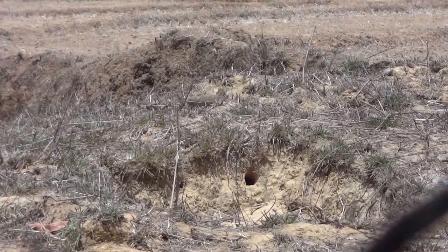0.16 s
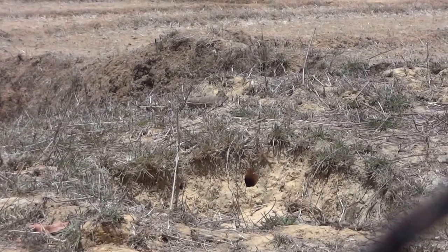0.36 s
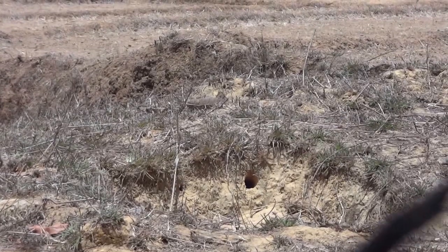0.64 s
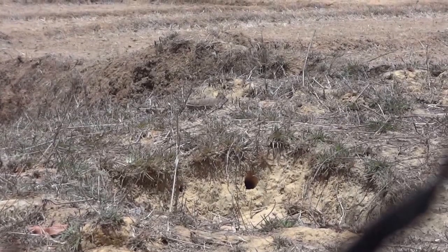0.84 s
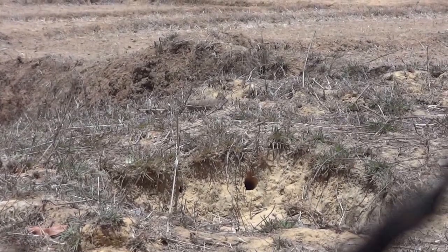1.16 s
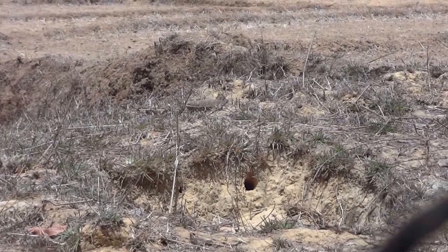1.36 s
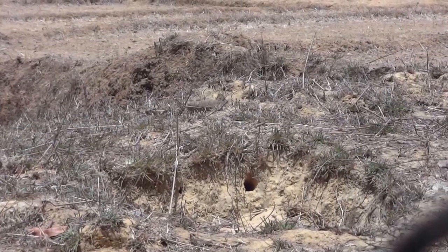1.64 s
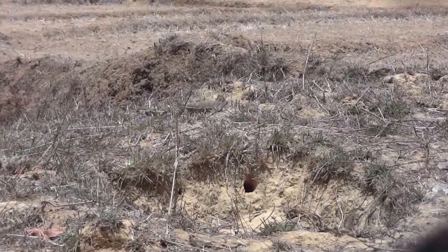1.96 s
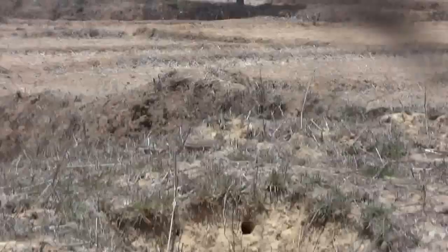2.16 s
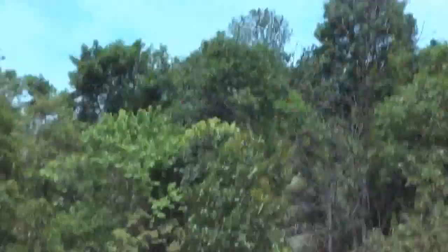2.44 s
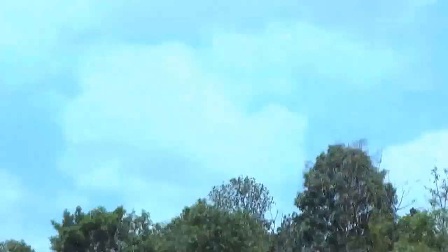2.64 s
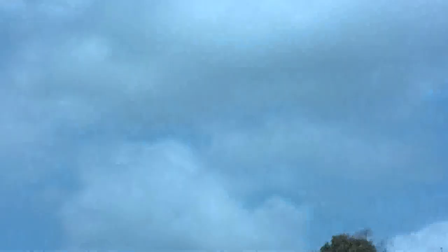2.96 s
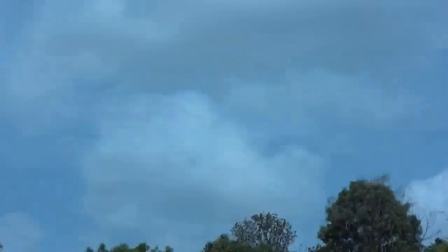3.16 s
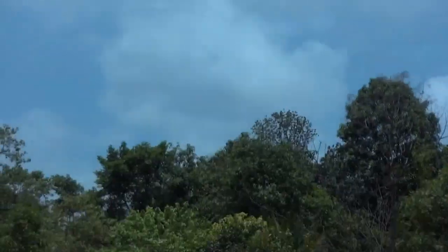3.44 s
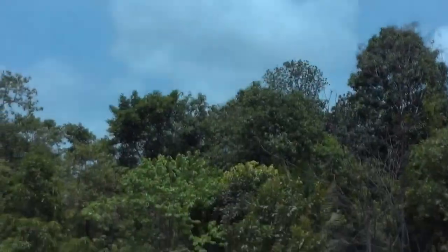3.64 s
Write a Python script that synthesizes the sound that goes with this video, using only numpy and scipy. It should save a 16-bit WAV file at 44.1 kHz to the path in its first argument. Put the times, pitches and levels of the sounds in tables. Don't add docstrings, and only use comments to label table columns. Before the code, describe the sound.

Thin, high, slightly drooping bird whistles repeat at a steady pace above a faint grassy breeze.

```python
import sys
import numpy as np
from scipy import signal
from scipy.fft import rfft, irfft, next_fast_len
from scipy.io import wavfile
from scipy.ndimage import uniform_filter1d, map_coordinates

SR = 44100
rng = np.random.default_rng(int(sys.argv[2]) if len(sys.argv) > 2 else 0)


def decibels_to_gain(level_db):
    exponent = np.asarray(level_db, float) / 20
    return 10 ** exponent


def inscribe(sig):
    pcm = np.round(np.clip(np.atleast_2d(sig).T, -1, 1) * 32767)
    wavfile.write(sys.argv[1], SR, pcm.astype(np.int16))


N = 167580

# (time [s], level [dB])
BREEZE_STRENGTH = [(0, -48.5), (.5, -49.5), (1.05, -50.5), (1.29, -53), (1.6, -52), (2.1, -54), (2.54, -54),
                   (2.75, -52.5), (2.92, -54), (3.15, -53), (3.8, -55.5)]
# (frequency [Hz], density [dB per Hz])
GRASS_MID_SPECTRUM = [(1180, -16), (2000, -6.5), (2970, -0.5), (3560, -2), (3910, -2), (4640, -4),
                      (6900, -8), (9980, -10), (15600, -23.5)]
GRASS_SIDE_SPECTRUM = [(1180, -44), (2000, -11), (3470, 1), (3910, -2), (8550, -10), (13600, -20.5),
                       (15600, -34)]
FAR_MID_SPECTRUM = [(15, -43), (25, -13), (154, -19.5), (189, -17.5), (326, -7.5), (408, -4.5), (756, -0.5),
                    (1540, -2), (2200, -5.5), (2860, -17), (4840, -120)]
FAR_SIDE_SPECTRUM = [(15, -68), (25, -51), (393, -7), (501, -2.5), (615, -6), (676, -1), (800, -3),
                     (1400, -4.5), (2200, -6.5), (2860, -15), (4840, -120)]
# (start [s], length [s], level [dB], settled pitch [Hz], middle of slide [s])
WHISTLES = [(.024, .192, -45, 2728, .048), (.543, .174, -43.5, 2722, .038), (1.056, .17, -44.8, 2718, .026),
            (1.593, .16, -43.5, 2680, .05), (2.158, .14, -42.5, 2688, .033),
            (2.712, .137, -46.5, 2694, .04), (3.354, .153, -46.5, 2700, .026)]
# (start [s], length [s], level [dB], first pitch [Hz], last pitch [Hz])
ANSWERS = [(.27, .03, -49, 3175, 3150), (.335, .035, -59, 3180, 3160), (.743, .064, -43, 3095, 3005),
           (.815, .022, -47, 3060, 3045), (.838, .022, -51, 3040, 3020), (.808, .046, -56, 4240, 4215),
           (.856, .04, -49, 2155, 2125), (.895, .045, -57, 2120, 2095), (.96, .05, -59, 2095, 2120),
           (3.186, .022, -57, 3850, 3950), (3.2, .02, -56, 4420, 4250), (3.214, .028, -58, 4150, 3880)]
# (start [s], length [s], level [dB], pitch [Hz])
RETURNS = [(.218, .025, -57, 2700), (1.222, .05, -56, 2695), (1.75, .02, -55, 2670), (2.3, .03, -55, 2720),
           (2.85, .06, -58, 2670), (3.51, .03, -56, 2660)]
# (time [s], gain [dB], half width [s])
AIR_FADES = [(.048, 2.5, .015), (.098, -8, .022), (.128, -9, .009), (.148, 2, .012), (.192, -5, .012),
             (.566, 1, .012), (.585, -2.5, .008), (.755, -3, .012), (.865, -5, .014), (1.065, -2.5, .012),
             (1.17, -2.5, .008), (1.6, -4, .012), (1.627, -16, .012), (2.168, -5, .01), (2.21, -5, .007),
             (2.265, 1, .02), (2.734, 2, .01), (2.756, -9, .011), (2.79, 2.5, .02), (2.835, -1.5, .015),
             (3.386, -6, .009), (3.436, -3, .009), (3.49, -2, .02)]
# (time [s], level [dB])
GUST_LEVEL = [(0, -61), (.1, -57), (.135, -47), (.16, -38), (.2, -38.5), (.25, -41), (.275, -49),
              (.36, -58), (.45, -64), (.6, -64), (.7, -69), (.85, -66), (.95, -58), (1.03, -70), (1.2, -74),
              (1.4, -76.5)]
# (frequency [Hz], density [dB per Hz])
BUFFET_SPECTRUM = [(15, -45), (25, 6.5), (54, -3.5), (177, -1.5), (270, -7.5), (355, -5.5), (435, -12),
                   (800, -24), (1040, -57), (1760, -120)]
# (time [s], level [dB], frequency [Hz])
PUFFS = [(.083, -44, 85), (.104, -52, 170), (.124, -36, 272), (.143, -28, 170), (.157, -24, 120),
         (.174, -29, 310), (.186, -35, 140), (.197, -26, 220), (.215, -35, 300), (.226, -31, 200),
         (.236, -36, 220), (.251, -27, 180), (.266, -39, 164), (.295, -45, 110), (.312, -49, 65),
         (.348, -46, 78), (.413, -38, 120), (.489, -55, 108), (.6, -48.5, 123), (.898, -49, 112),
         (.954, -51, 108), (.989, -47.5, 96), (1.199, -58, 60), (1.223, -60, 86), (2.039, -60, 81)]
# (middle [s], half length [s], level [dB], centre [Hz], bandwidth [octaves])
RUSTLES = [(.11, 0.036, -51, 3800, .5), (0.22, 0.033, -52, 3200, 0.26), (.31, 0.018, -52, 2900, 0.3),
           (.555, 0.048, -52.5, 7100, .5), (.83, 0.03, -52, 4000, 0.34), (.96, 0.03, -56, 2400, 0.4),
           (2.81, 0.032, -55, 8100, 0.56), (3.14, 0.12, -56.5, 7500, 0.67), (3.21, 0.038, -61, 3900, .1),
           (2.7, 0.046, -54, 4400, 0.92), (0.8, 0.096, -60, 10500, .3), (0.11, 0.057, -51, 8300, 0.7),
           (0.68, 0.13, -57, 8900, 0.34)]
# (time [s], peak level [dB], centre [Hz], bandwidth [octaves])
TICKS = [(.3114, -34, 2920, .35), (.5396, -37, 7000, .58), (.9044, -38, 3100, .2), (1.6455, -43, 11000, .9),
         (1.779, -45, 6500, .5), (1.961, -45, 2500, .8), (1.975, -50, 12500, .4), (2.3094, -47, 11500, .5),
         (3.1295, -44, 10000, .6), (3.1394, -43, 7000, .3), (3.755, -43, 4300, .3)]
# (frequency [Hz], phase [rad])
PORT_LEAD = [(400, 0), (690, 1), (1400, .8), (1900, .45), (2800, .47), (3800, .34), (6900, .26),
             (14000, .1)]


def unit(x):
    return x / np.sqrt(np.mean(x ** 2) + 1e-20)


def along(points, hz):
    f, v = np.transpose(points)
    return np.interp(np.log(hz + 1), np.log(f + 1), v)


def curve(rows):
    return np.interp(np.arange(N) / SR, *np.transpose(rows))


def wobble(rate_hz):
    knots = rng.standard_normal(int(N * rate_hz / SR) + 4)
    return map_coordinates(knots, [np.arange(N) * rate_hz / SR])


def band(x, hz, octaves):
    f = np.fft.rfftfreq(len(x), 1 / SR) + 1
    bell = np.exp(-(np.log2(f / hz) / octaves) ** 2)
    return unit(irfft(rfft(x) * bell, len(x)))


def hiss(spectrum, patchy_db):
    z = signal.stft(rng.standard_normal(N + 512), nperseg=512)[2]
    field = uniform_filter1d(rng.standard_normal(z.shape), 5, 0)
    field = uniform_filter1d(field, 9, 1)
    x = signal.istft(z * decibels_to_gain(patchy_db * unit(field)), nperseg=512)[1][:N]
    m = next_fast_len(N + 8192)
    gain = decibels_to_gain(along(spectrum, np.fft.rfftfreq(m, 1 / SR)))
    return unit(irfft(rfft(x, m) * gain, m)[:N])


def pair(mid, side):
    return np.array([mid + side, mid - side])


def add(out, s, x):
    part = out[..., max(round(s * SR), 0):][..., :x.shape[-1]]
    part += x[..., :part.shape[-1]]


def grass():
    stalks_per_s, stalk_db, crackle_t60_s = 150, -14.5, 0.011
    rows = rng.random((int(stalks_per_s * N / SR), 2))
    hits = (rows[:, 0] * N).astype(int)
    stalks = np.bincount(hits, decibels_to_gain(stalk_db + 13 * rows[:, 1] ** 3), N)
    decay = decibels_to_gain(-60 * np.arange(300) / SR / crackle_t60_s)
    crackle = 1 + np.convolve(stalks, decay)[:N]
    mid = hiss(GRASS_MID_SPECTRUM, patchy_db=1.1) * crackle
    lean = 0.07 * band(mid, 2800, 1.2)
    side = lean + decibels_to_gain(-12) * hiss(GRASS_SIDE_SPECTRUM, patchy_db=1.1)
    level_db = curve(BREEZE_STRENGTH) + 3.0 + 0.54 * wobble(7.06) + 0.15 * wobble(20)
    return pair(mid, side) * decibels_to_gain(level_db)


def far_wash():
    far_db, follows = -4, 0.24
    strength_db = curve(BREEZE_STRENGTH)
    mean_db = strength_db.mean()
    mid = hiss(FAR_MID_SPECTRUM, patchy_db=1.2)
    side = 0.055 * mid + decibels_to_gain(-2.5) * hiss(FAR_SIDE_SPECTRUM, patchy_db=-0.5)
    return pair(mid, side) * decibels_to_gain(mean_db + far_db + follows * (strength_db - mean_db))


def note(t, length_s, hz, level_db, waver):
    attack_s, release_s = min(.011, length_s / 3), min(.015, length_s / 3)
    waver_hz, overtone_db = 9, -27
    edge = np.clip(np.minimum(t / attack_s, (length_s - t) / release_s), 0, 1)
    phase = 2 * np.pi * np.cumsum(hz + waver_hz * waver[:len(t)]) / SR
    tone = np.sin(phase) + decibels_to_gain(overtone_db) * np.sin(2 * phase)
    return np.sqrt(2) * np.sin(np.pi / 2 * edge) * decibels_to_gain(level_db) * tone


def whistles(waver):
    glide_ratio, glide_s = .059, .012
    sag_hz_per_s, droop_hz, droop_s = 300, 70, .011
    out = np.zeros(N)
    for s, length_s, db, end_hz, slide_s in WHISTLES:
        t = np.arange(int(length_s * SR)) / SR
        slide = 1 + glide_ratio / (1 + np.exp((t - slide_s) / glide_s))
        sag = sag_hz_per_s * (length_s - t)
        droop = droop_hz * np.exp((t - length_s) / droop_s)
        add(out, s, note(t, length_s, end_hz * slide + sag - droop, db, waver[round(s * SR):]))
    return out


def answers_and_returns(waver):
    out = np.zeros(N)
    steady = [(*row, row[-1]) for row in RETURNS]
    for s, length_s, db, first_hz, last_hz in ANSWERS + steady:
        t = np.arange(int(length_s * SR)) / SR
        hz = first_hz + (last_hz - first_hz) * t / length_s
        add(out, s, note(t, length_s, hz, db, waver[round(s * SR):]))
    return out


def air_fading():
    t = np.arange(N) / SR
    dips_db = sum(db * np.exp(-((t - s) / half_s) ** 2) for s, db, half_s in AIR_FADES)
    return decibels_to_gain(1.1 * wobble(37) + dips_db)


def tree_echo(x):
    t60_s, delay_s = 0.52, .008
    t = np.arange(SR // 2) / SR
    tail = rng.standard_normal((2, len(t))) * decibels_to_gain(-60 * t / t60_s) * (t > delay_s)
    tail = tail / np.linalg.norm(tail[0])
    return signal.fftconvolve(x[None], tail, axes=1)[:, :N]


def birds():
    echo_db, pan_db = -16, 1.6
    waver = wobble(60)
    calls = (whistles(waver) + answers_and_returns(waver)) * air_fading()
    return calls * decibels_to_gain([[pan_db / 2], [-pan_db / 2]]) + decibels_to_gain(echo_db) * tree_echo(calls)


def rumble():
    level_db = curve(GUST_LEVEL) - 5.5 + 3.3 * wobble(40)
    mid = hiss(BUFFET_SPECTRUM, patchy_db=1.0)
    side = 0.86 * band(hiss(BUFFET_SPECTRUM, patchy_db=2.5), 280, 1.7)
    return decibels_to_gain(level_db) * pair(mid, side)


def push(t, hz, turn):
    cycles = 1.08
    return np.exp(-(t * hz * 2 / cycles) ** 2) * np.cos(2 * np.pi * (hz * t + turn))


def puffs():
    side_hz_ratio, lean = 1.56, .35
    out = np.zeros((2, N))
    t = np.arange(-1500, 1500) / SR
    for (s, db, hz), turns in zip(PUFFS, rng.random((len(PUFFS), 2))):
        mid = push(t, hz, turns[0])
        side_db = -1.5 + .3 * (db + 32)
        side = decibels_to_gain(side_db) * push(t, hz * side_hz_ratio, turns[1])
        add(out, s + t[0], decibels_to_gain(db - 3.5) * pair(mid, side + lean * mid))
    return out


def rustles():
    out = np.zeros(N)
    t = np.arange(-8192, 8192) / SR
    grains = rng.standard_normal((len(RUSTLES), len(t)))
    for (s, half_s, db, hz, octaves), noise in zip(RUSTLES, grains):
        swell = decibels_to_gain(db) * np.exp(-(t / half_s) ** 2) * band(noise, hz, octaves)
        before_start = max(-round((s + t[0]) * SR), 0)
        add(out, s + t[0], swell[before_start:])
    return out


def ticks():
    t60_s = 0.009
    out, t = np.zeros(N), np.arange(512) / SR
    for (s, db, hz, octaves), noise in zip(TICKS, rng.standard_normal((len(TICKS), 512))):
        burst = np.roll(decibels_to_gain(-60 * t / t60_s) * noise, 40)
        add(out, s, decibels_to_gain(db - 14) * band(burst, hz, octaves))
    return out


def stem_knock():
    start_s, t60_s = 3.1285, .07
    out, t = np.zeros(N), np.arange(4096) / SR
    for hz, db in [(2640, -41), (2915, -43)]:
        add(out, start_s, decibels_to_gain(db - 60 * t / t60_s) * np.sin(2 * np.pi * hz * t))
    return out


def scene():
    breeze = grass() + far_wash()
    buffeting = rumble() + puffs()
    stalks = rustles() + ticks() + stem_knock()
    return breeze + birds() + buffeting + stalks


def low_pass(x):
    return signal.sosfilt(signal.butter(12, 15730, fs=SR, output="sos"), x)


def record(dry):
    wind_cut_hz = 48
    m = next_fast_len(N + 8192)
    turn = np.exp(.5j * along(PORT_LEAD, np.fft.rfftfreq(m, 1 / SR)))
    ports = irfft(rfft(dry, m) * [turn.conj(), turn], m)[:, :N]
    low_cut = signal.butter(4, wind_cut_hz, "high", fs=SR, output="sos")
    mix = signal.sosfilt(low_cut, ports)
    return low_pass(mix)


dry = scene()
out = record(dry)
inscribe(out)
```